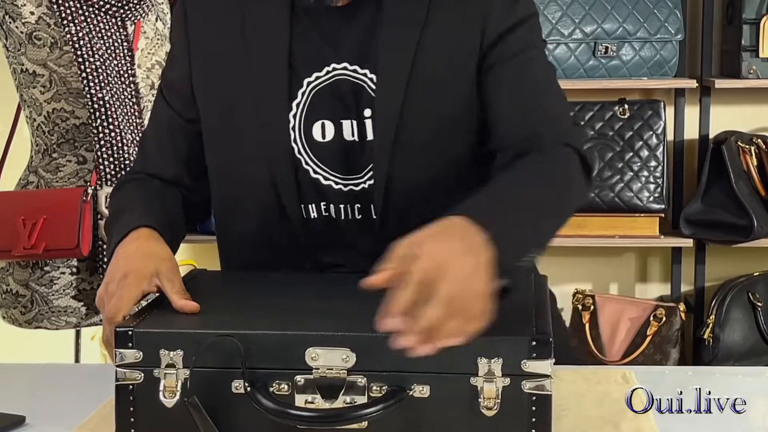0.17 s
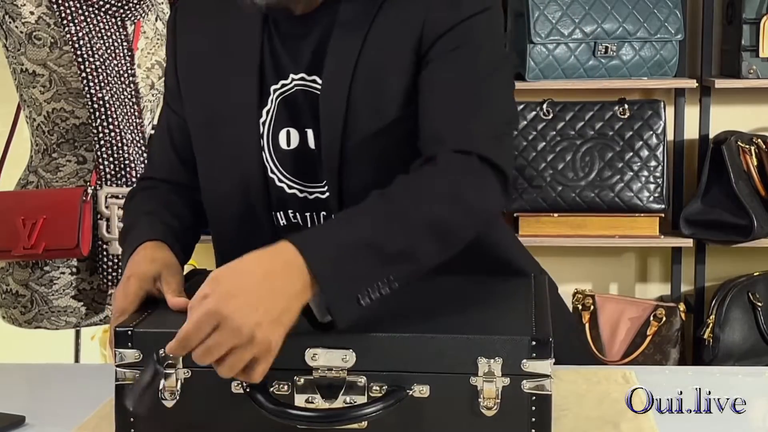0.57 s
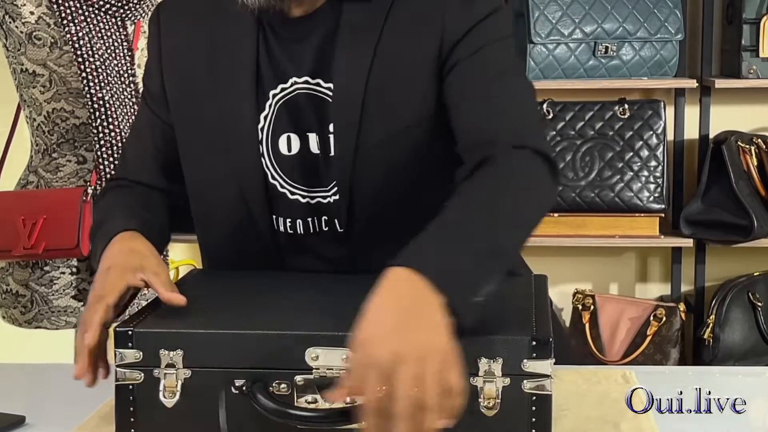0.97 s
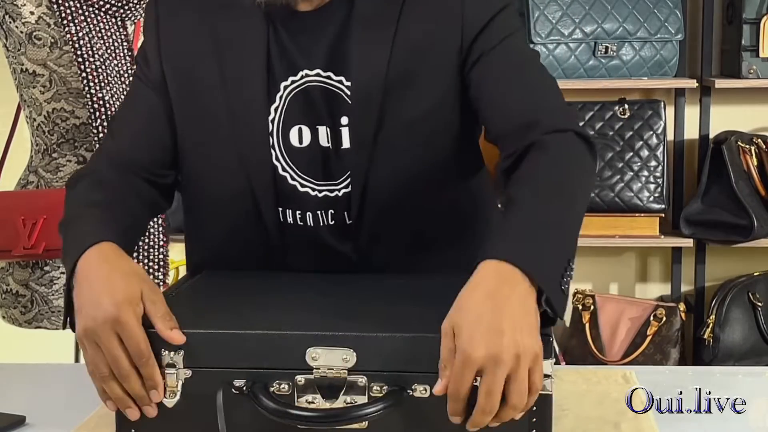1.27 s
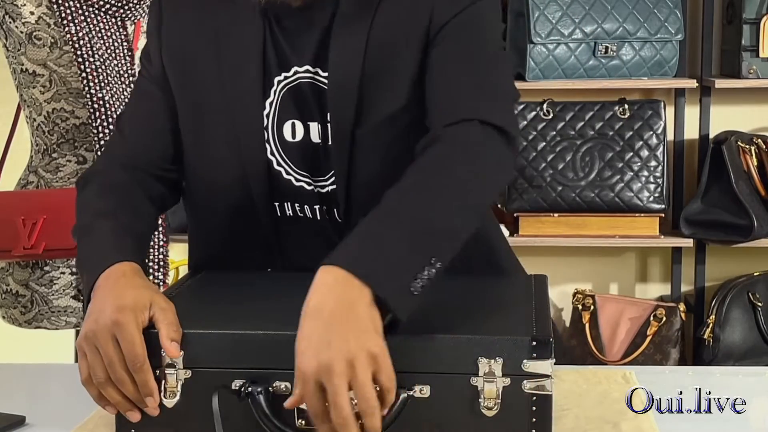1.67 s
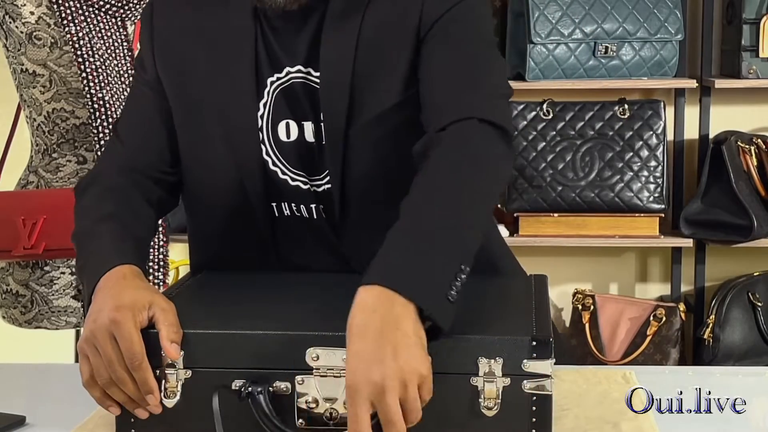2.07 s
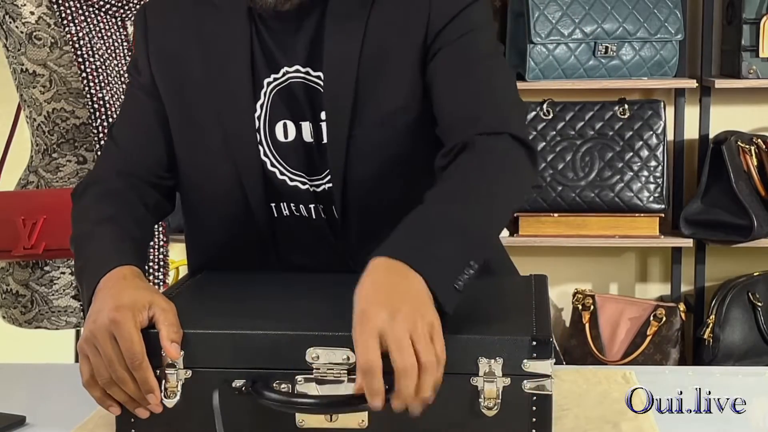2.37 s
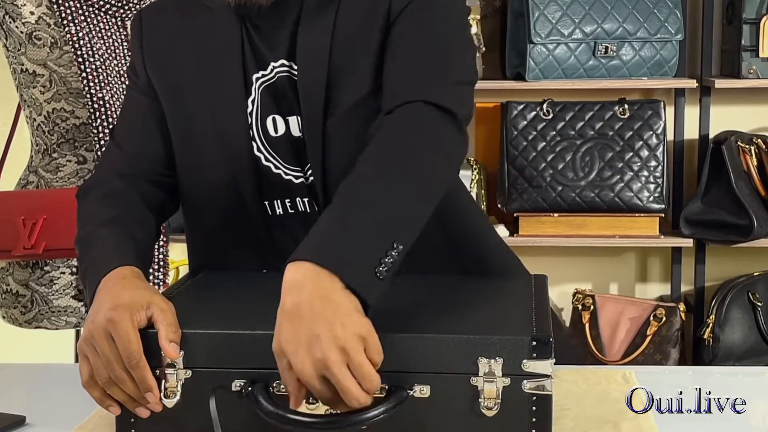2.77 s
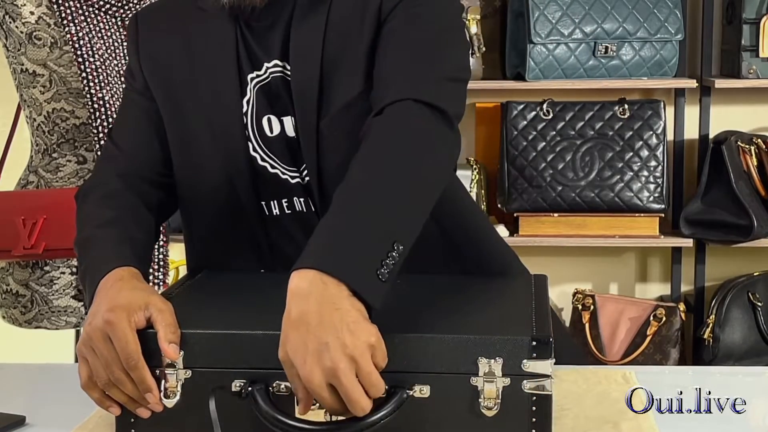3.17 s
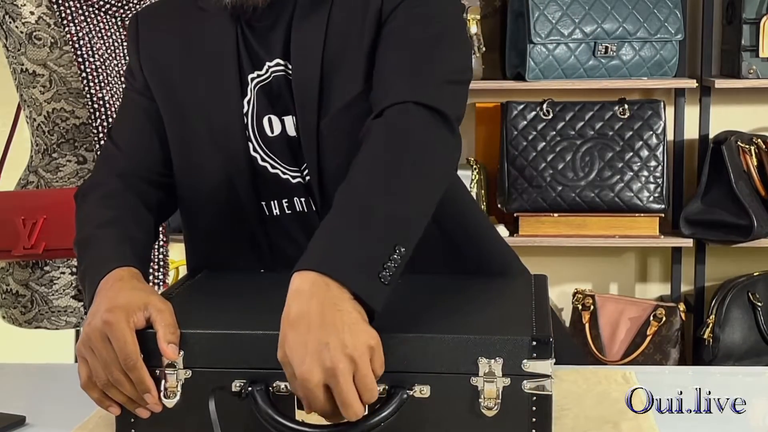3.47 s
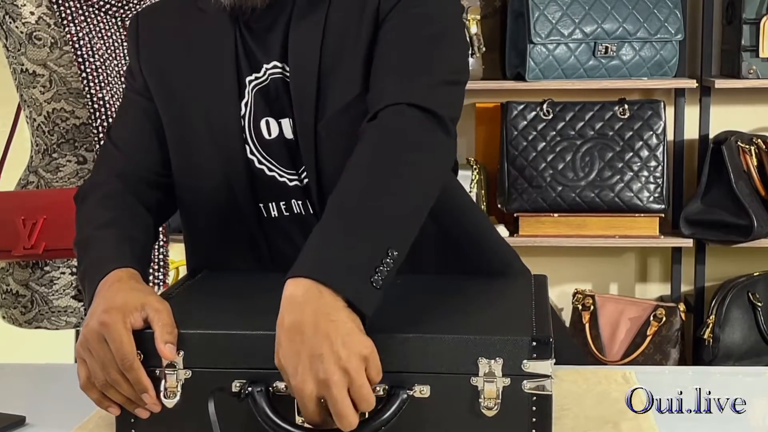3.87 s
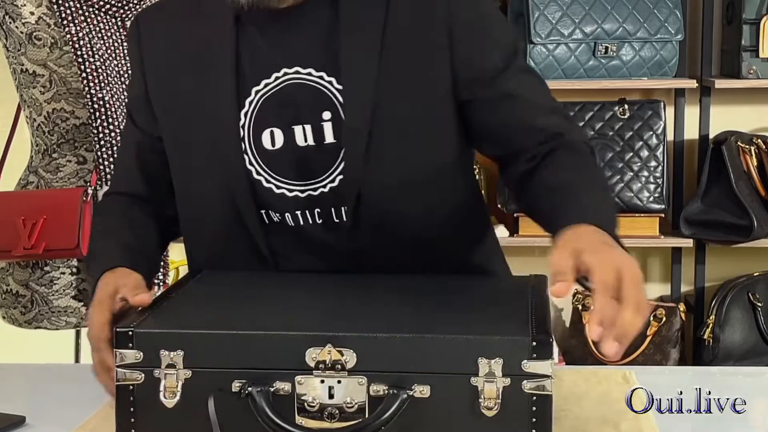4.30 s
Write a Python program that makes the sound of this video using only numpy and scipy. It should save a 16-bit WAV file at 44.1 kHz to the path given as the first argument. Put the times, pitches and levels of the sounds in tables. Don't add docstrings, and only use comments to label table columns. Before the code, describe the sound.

A microphone at arm's length picks up very quiet handling of a leather case on a table: cloth rustle, low dull thumps, fingernail ticks and an early short metal rattle. Small clicks gather inside the lock until the flap slams against the case, by far the loudest moment, bouncing in a quick metallic stutter with a short bright room reflection. Faint rustles and taps follow.

```python
import sys
import numpy as np
from scipy import signal
from scipy.fft import rfft, irfft, next_fast_len
from scipy.io import wavfile
from scipy.ndimage import uniform_filter1d

SR = 44100
rng = np.random.default_rng(int(sys.argv[2]) if len(sys.argv) > 2 else 0)


def invert_db(x):
    u = np.asarray(x, float) / 20
    return 10 ** u


def master_out(mix):
    frames = np.transpose(np.atleast_2d(mix))
    ceiling = np.clip(frames, -1, 1)
    pcm = np.round(ceiling * 32767).astype(np.int16)
    wavfile.write(sys.argv[1], SR, pcm)


N = 195627

# (time [s], arm movement [dB], hand weight [dB])
SLEEVE = [(0.0, -72, -75.5), (.2, -64.5, -78), (.36, -72, -76), (.76, -75, -78), (1.17, -76, -72.5),
          (1.38, -76.5, -73.5), (1.51, -70, -73), (1.68, -74, -77), (1.9, -69, -70), (2.26, -75.5, -77),
          (2.6, -69.5, -78.5), (2.85, -78.5, -75.5), (3.3, -86.5, -78), (3.5, -74, -71.5),
          (3.78, -75.5, -72), (4.04, -67.5, -69.5), (4.2, -65.5, -79.5), (4.44, -78, -71)]
# (frequency [Hz], density [dB/Hz])
CLOTH = [(180, -28), (300, -5.5), (392, -4), (787, -9), (842, -8), (1140, -6), (1410, -8.5), (3830, -7.5),
         (8500, -19), (16000, -29.5)]
# (frequency [Hz], density [dB/Hz])
RUMBLE = [(15, -47.5), (25, -8.5), (55, 3), (192, 5), (263, 3), (389, -2), (472, 1.5), (900, -12),
          (1170, -36.5), (1980, -120)]
# (frequency [Hz], density [dB/Hz])
HUSH = [(120, -34), (200, -1.5), (583, -1.5), (639, -0.5), (1340, -7), (3760, -18), (6780, -22.5),
        (14400, -39.5), (16400, -42)]
# (time [s], peak [dB], centre [Hz], room [dB])
TICKS = [(0.298, -63, 940, 11), (1.407, -51, 1100, -1), (3.025, -49.5, 1200, -6), (2.243, -54, 1190, -6),
         (2.437, -55.5, 716, -6), (2.793, -51, 1500, 5.5), (4.021, -54, 930, -1), (4.411, -44.5, 700, 7.5)]
# (time [s], peak [dB])
CATCH = [(0.8023, -34), (.8055, -41), (0.813, -31.5), (.8165, -32), (0.8302, -26), (0.8351, -34.5),
         (0.8394, -35.5), (0.8458, -33), (.853, -36.5), (.863, -46), (.872, -46)]
# (time [s], peak [dB], centre [Hz], room [dB])
LOCK = [(2.681, -52, 2660, -4), (2.924, -56, 1100, 11.5), (2.993, -46, 2130, 7.5), (3.124, -54, 2600, 12),
        (3.303, -57, 1270, 0.5), (3.314, -47.5, 1494, 4), (3.39, -45, 2480, 5), (3.497, -57.5, 1230, 1),
        (3.517, -50.5, 3010, 3), (3.528, -42.5, 1193, -0.5), (3.878, -30, 3820, -8),
        (3.8785, -38, 10000, 5.5), (4.034, -52, 2020, -17), (4.353, -57, 2500, 1), (4.375, -53, 3000, -2.5)]
# (time [s], peak [dB], pitch [Hz])
THUMPS = [(0.502, -57, 549), (0.51, -52.5, 232), (0.526, -52.5, 132), (0.701, -66, 385), (0.817, -44, 227),
          (0.83, -53, 220), (1.072, -61, 117), (1.1, -59.5, 104), (1.138, -58.5, 120), (1.406, -58.5, 440),
          (1.426, -53.5, 213), (1.609, -66, 75), (1.749, -58, 443), (1.858, -44, 470), (1.999, -54, 230),
          (2.246, -62.5, 138), (2.428, -40, 178), (2.598, -64.5, 121), (2.738, -62, 51.7),
          (2.981, -54.5, 119), (3.0, -50, 510), (3.123, -53, 500), (3.395, -54, 450.7), (3.399, -52.5, 127),
          (3.877, -46.5, 417), (3.959, -57, 187.5), (4.035, -49, 382), (4.35, -51, 357.3),
          (4.389, -49.5, 242), (4.407, -44, 159)]
# (time [s], peak [dB], pitch [Hz])
STRAIN = [
    (3.544, -42, 350),
    (3.5505, -29, 350),
]
# (time [s], peak [dB], centre
# [Hz], width share [1])
SPITS = [(.613, -64, 4180, .5), (1.8601, -57, 1720, .15), (0.803, -49, 11000, 0.95),
         (0.815, -46, 12000, .9), (0.829, -43.5, 9100, 1.2), (1.102, -64, 5200, 0.21),
         (1.127, -50, 4860, 0.3), (1.134, -60, 13500, .3), (1.3307, -51, 2740, 0.48),
         (1.42, -62, 7400, .15), (1.689, -61, 14000, .5), (1.781, -54, 12000, 2.5),
         (1.829, -56, 11100, 0.16), (1.842, -59, 9000, .8), (1.893, -64, 13000, 1.1),
         (1.907, -57, 7000, 1.5), (1.94, -55, 1700, 1.5), (.831, -35, 2660, 0.16), (2, -45, 2290, 2.2),
         (2.3, -65, 11900, 0.32), (2.328, -54.5, 1930, 0.56), (2.328, -50.5, 12000, 1.7),
         (2.426, -58, 6460, 0.66), (2.438, -56, 11600, .5), (2.786, -66, 6000, 1.3),
         (3.487, -55.5, 9450, .25), (3.497, -56, 3200, 0.5), (3.557, -43, 3600, .6),
         (4.424, -64, 10000, 0.64), (4.034, -53, 7980, 1.2)]
# (time [s], length [s], hiss [dB], fade share [1])
RUBS = [(0.68, 0.038, -74, 0.21), (1.065, 0.05, -69.5, 0.24), (1.552, 0.027, -56, 0.15),
        (2.059, 0.015, -53, 0.26), (2.781, 0.022, -71.5, 0.28), (3.528, 0.018, -49, 1.5),
        (3.863, 0.013, -53.5, 0.76), (4.011, 0.016, -66, 0.72), (4.39, 0.029, -59.5, 1.5)]
# (frequency [Hz], density [dB/Hz])
RUB = [(290, -38), (500, -1.5), (962, -0.5), (1990, -6), (3230, -1), (5090, -7.5), (6960, -11),
       (15000, -51.5)]
# (time [s], length [s], level [dB], start [Hz], end [Hz])
SQUEAKS = [
    (1.541, .036, -59, 1160, 640),
    (2.0538, .011, -53, 870, 1170),
    (2.063, .008, -63, 800, 1000),
]
# (time [s], level [dB], frequency
# [Hz], t60 [s])
RINGS = [(1.861, -48.5, 510, .08), (2.772, -58, 845, .1), (2.772, -63, 1690, 0.11),
         (2.428, -53, 504, 0.058), (2.77, -61, 410, .15), (.832, -51, 214, 0.17), (2.4, -60.5, 210, 0.13),
         (2.995, -62.5, 206, 0.15), (3.8777, -51, 3830, .16), (.803, -62.5, 7550, 0.21),
         (.831, -69, 8100, 0.1)]
# (time [s], peak [dB], knock on the lid [dB], room [dB], landing spot [Hz])
FLAP = [
    (3.5704, 2.5, -10, -5, 4607),
    (3.6078, -4, -7.5, -7.5, 2900),
    (3.6206, -25, 1, -16.5, 2500),
    (3.6346, -10.5, -6.5, -17.5, 5200),
    (3.6476, -20, -2.5, -15, 4800),
]
# (frequency [Hz], width [Hz], level [dB])
STEEL = [(964, 170, 2), (1450, 65, 4.5), (2360, 90, 4), (3270, 190, 0.5), (5120, 180, 0.5),
         (5700, 110, -9.5), (6550, 190, -2), (7630, 80, -4), (8900, 170, -18.5), (9300, 140, -15.5),
         (9050, 360, -20)]
# (frequency [Hz], width [Hz], level [dB])
LID = [(198, 52, -8.5), (411, 153, 5), (494.3, 162, 7.5)]
# (frequency [Hz], t60 [s])
SHOP = [(150, 0.31), (400, 0.22), (2000, 0.18), (8000, 0.24), (14000, 0.18)]
# (frequency [Hz], level [dB])
SHELVES = [(200, 1), (1000, 1), (4000, 1), (7500, 2), (10000, -3), (14000, 1)]
# (frequency [Hz], level [dB])
MIC = [(20, -14), (45, -4), (90, 3.5), (9000, -2), (12000, -4.5), (15000, -9), (16300, -9.5),
       (16700, -59.5)]

HUSH_DB = -74.5
FIZZ_DB, FIZZ_GROWS = -91.5, 1.3
FUMBLE_FROM_S, FUMBLE_TO_S, FUMBLE_DB = 1.35, 2.3, 5.5
CATCH_HZ, CATCH_ROOM_DB = 1100, -7.5
SKIN_TOP_HZ, LOCK_TOP_HZ, CATCH_TOP_HZ = 3600, 7000, 3500
SKIN_S, LOCK_S, CATCH_S, SPIT_S = 0.0013, 0.0022, 0.0032, 0.0015
THUMP_T60_S, LOWER_LASTS, THUMP_ROOM_DB = 0.034, 0.28, -8.5
BITE = 0.075
SPOT_DB, SPOT_WIDTH = 3, 0.31
GAP_HZ, GAP_WIDTH_HZ, GAP_DEPTH = 3950, 600, 0.85
BLUNT_HZ = 11500
WALLS_S, SLAP_S = 0.036, 0.0145


def unit(x):
    return x / np.sqrt(np.mean(x ** 2) + 1e-20)


def peak(x):
    return x / np.abs(x).max()


def along(points, hz):
    f, v = np.transpose(points)
    return np.interp(np.log(hz + 1), np.log(f + 1), v)


def filtered(x, response):
    m = next_fast_len(len(x) + 4096)
    spectrum = rfft(x, m) * response(np.fft.rfftfreq(m, 1 / SR))
    return irfft(spectrum, m)[:len(x)]


def resonances(modes):
    def response(f):
        total = 0
        for k, (hz, width, db) in enumerate(modes):
            damping = 1j * f * width
            total = total + (-1) ** k * invert_db(db) * damping / (hz * hz - f * f + damping)
        return total
    return response


def rush(spectrum, patchy_db):
    z = signal.stft(rng.standard_normal(N), nperseg=512)[2]
    field = uniform_filter1d(rng.standard_normal(z.shape), 6, 0)
    field = uniform_filter1d(field, 8, 1)
    noise = signal.istft(z * invert_db(patchy_db * unit(field)), nperseg=512)[1][:N]
    return unit(filtered(noise, lambda hz: invert_db(along(spectrum, hz))))


def off_axis(sound, response):
    click = filtered(np.arange(len(sound)) == 0, response)
    return click * np.linalg.norm(sound) / np.linalg.norm(click)


def add(track, s, sound, room_db, spread=None):
    hz, t, z = signal.stft(rng.standard_normal(SR // 2), SR, nperseg=256)
    z = z * invert_db(along(SHELVES, hz)[:, None] - 60 * t / along(SHOP, hz)[:, None])
    tail = signal.istft(z, SR, nperseg=256)[1]
    t = np.arange(len(tail)) / SR
    walls = 0.79 / (1 + np.exp((WALLS_S - t) / 0.00092))
    slap = 0.81 * np.exp(-((t - SLAP_S) / 0.0036) ** 2)
    tail = tail * (1 + walls + slap)
    source = sound if spread is None else spread
    wet = invert_db(room_db) * signal.fftconvolve(source, tail / np.linalg.norm(tail))
    wet[:len(sound)] += sound
    part = track[round(s * SR):][:len(wet)]
    part += wet[:len(part)]


def background():
    s, *columns = np.transpose(SLEEVE)
    t = np.arange(N) / SR
    cloth_db, rumble_db = [np.interp(t, s, c) for c in columns]
    searching = (t > FUMBLE_FROM_S) & (t < FUMBLE_TO_S)
    busy = uniform_filter1d(1.0 * searching, size=SR // 8)
    fizz_db = FIZZ_DB + FIZZ_GROWS * (cloth_db + 72) + FUMBLE_DB * busy

    snaps = rng.random(N) < 60 / SR
    crackle = snaps * invert_db(7.1 * rng.exponential(1, N).clip(0, 3)) * rng.standard_normal(N)
    crackle = filtered(crackle, resonances([(4590, 2800, -0.44), (11500, 3500, -1.8)]))
    fibres = invert_db(2) * (0.3 + busy) * crackle
    cloth = invert_db(cloth_db) * (rush(CLOTH, patchy_db=0.8) + fibres)
    fizz_spectrum = [(5000, -41.0), (9000, -1.0), (12000, 2.5), (16000, -4.5)]
    fizz = invert_db(fizz_db) * rush(fizz_spectrum, patchy_db=2.5)
    rumble = invert_db(rumble_db) * rush(RUMBLE, patchy_db=2.0)
    hush = invert_db(HUSH_DB) * rush(HUSH, patchy_db=4.0)
    return cloth + fizz + rumble + hush


def ticks():
    track, t = np.zeros(N), np.arange(SR // 20) / SR
    catch = [(s, db, CATCH_HZ, CATCH_ROOM_DB) for s, db in CATCH]
    skin_kind = (TICKS, SKIN_TOP_HZ, SKIN_S)
    catch_kind = (catch, CATCH_TOP_HZ, CATCH_S)
    lock_kind = (LOCK, LOCK_TOP_HZ, LOCK_S)
    for rows, top_hz, life in (skin_kind, catch_kind, lock_kind):
        for s, db, hz, room_db in rows:
            body = resonances([(hz, 1.6 * hz, 0)])
            part = lambda f: body(f) / (1 + 1j * f / top_hz) ** 2 / (1 + 1j * f / 9000) ** 2
            burst = rng.standard_normal(len(t)) * np.exp(-t / life)
            tick = invert_db(db) * peak(filtered(burst, part))
            add(track, s, tick, room_db, off_axis(tick, part))
    return track


def thumps():
    track, t = np.zeros(N), np.arange(SR // 3) / SR
    for s, db, hz in list(THUMPS) + list(STRAIN):
        t60 = THUMP_T60_S * (200 / hz) ** LOWER_LASTS
        push = np.exp(-((t * hz - 0.6) / 0.2) ** 2)
        modes = resonances([(hz, np.log(1000) / np.pi / t60, 0), (2.5 * hz, 0.6 * hz, -3)])
        add(track, s, invert_db(db) * peak(filtered(push, modes)), THUMP_ROOM_DB)
    return track


def spits():
    track, t = np.zeros(N), np.arange(SR // 20) / SR
    for s, db, hz, share in SPITS:
        ring = resonances([(hz, share * hz, 0)])
        burst = rng.standard_normal(len(t)) * np.exp(-t / SPIT_S)
        spit = filtered(burst, lambda f: ring(f) ** 2)
        add(track, s, invert_db(db) * peak(spit), -11)
    return track


def rubs():
    track = np.zeros(N)
    for s, life, hiss_db, fade in RUBS:
        u = np.linspace(0, 1, int(2 * life * SR))
        hiss = unit(filtered(rng.standard_normal(len(u)), lambda hz: invert_db(along(RUB, hz))))
        stroke = peak(u ** 1.2 * np.exp(-u / fade))
        add(track, s, invert_db(hiss_db) * stroke * hiss, -4)
    return track


def rings():
    track, t = np.zeros(N), np.arange(SR // 4) / SR
    for s, db, hz, t60 in RINGS:
        hum = unit(filtered(rng.standard_normal(len(t)), resonances([(hz, 0.06 * hz, 0)])))
        add(track, s, invert_db(db - 60 * t / t60) * hum, -9)
    return track


def squeaks():
    track = np.zeros(N)
    for s, life, db, from_hz, to_hz in SQUEAKS:
        u = np.linspace(0, 1, int(life * SR))
        turns = np.cumsum(from_hz + (to_hz - from_hz) * u) / SR
        squeak = np.zeros(len(u))
        for k in range(8):
            partial_db = -1.6 * k - 3.5 * (k == 1) + 1.2 * (k == 2)
            entry = np.minimum(1, u / (BITE * k + 0.01))
            squeak += invert_db(partial_db) * entry * np.sin(2 * np.pi * ((k + 1) * turns + rng.random()))
        stroke = np.sqrt(np.abs(np.sin(np.pi * u)))
        add(track, s, invert_db(db) * stroke * unit(squeak), -1.5)
    return track


def flap():
    track, t = np.zeros(N), np.arange(SR // 10) / SR
    blunt = lambda f: 1 / (1 + 1j * f / BLUNT_HZ * 2.18 - (f / BLUNT_HZ) ** 2) ** 2
    gap = lambda f: 1 - GAP_DEPTH * resonances([(GAP_HZ, GAP_WIDTH_HZ, 0)])(f)
    plate = resonances([(7000, 5000, 0)])
    around = resonances([(1250, 1500, 1), (3100, 2600, -2), (7200, 6500, -4)])
    for s, db, knock_db, room_db, spot_hz in FLAP:
        chatter = rng.standard_normal(len(t)) * invert_db(-60 * t / 0.0062)
        chatter[4] += 3.5
        steel = resonances([(hz, 1.6 * w, level + rng.normal(0, 1.8)) for hz, w, level in STEEL])
        spot = resonances([(spot_hz, SPOT_WIDTH * spot_hz, SPOT_DB)])
        metal = lambda f: steel(f) + invert_db(-5.0) * plate(f) + spot(f)
        clang = peak(filtered(chatter, lambda f: metal(f) * blunt(f) * gap(f)))
        push = -np.exp(-((t - 0.0017) / 0.0004) ** 2)
        knock = invert_db(knock_db + 1) * peak(filtered(push, resonances(LID)))
        broad = off_axis(clang, lambda f: blunt(f) * around(f))
        spread = invert_db(db) * (broad + invert_db(-2.5) * knock)
        add(track, s, invert_db(db) * (clang + knock), room_db, spread)
    return track


def scene():
    handling = background() + ticks() + thumps() + spits() + rubs()
    return (handling + rings() + squeaks() + flap())[None]


def band_limit(x):
    return signal.sosfilt(signal.butter(12, 16590, fs=SR, output="sos"), x)


def record(dry):
    soft = dry[0] / (1 + np.abs(dry[0] / 0.97) ** 6) ** (1 / 6)
    mix = filtered(soft, lambda hz: invert_db(along(MIC, hz)))[None]
    return band_limit(mix)


dry = scene()
out = record(dry)
master_out(out)
```